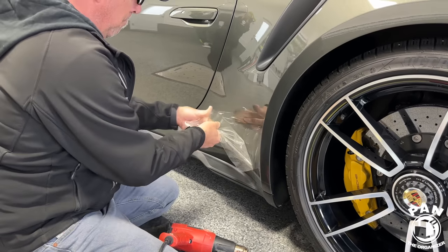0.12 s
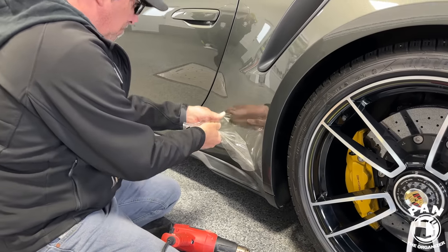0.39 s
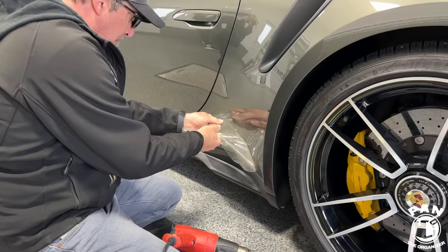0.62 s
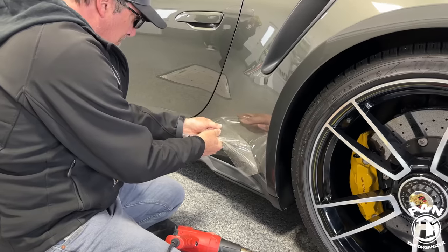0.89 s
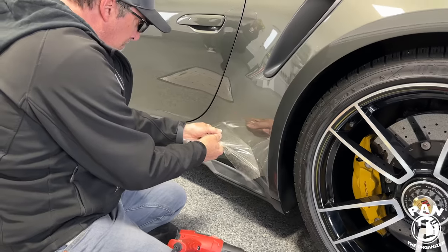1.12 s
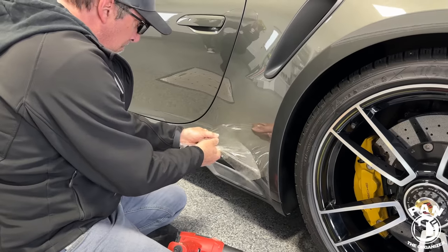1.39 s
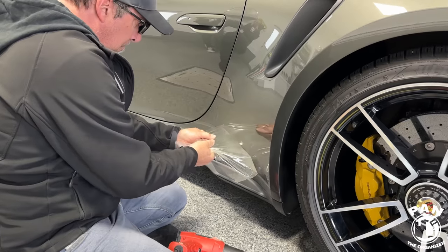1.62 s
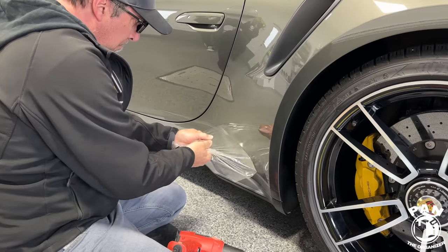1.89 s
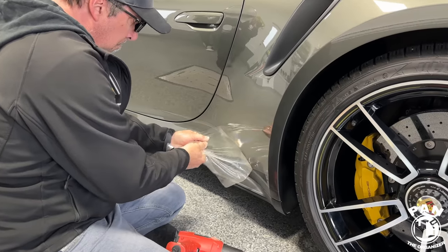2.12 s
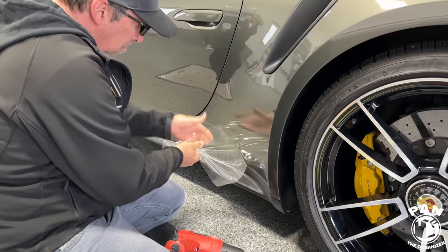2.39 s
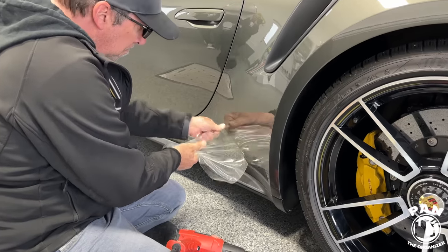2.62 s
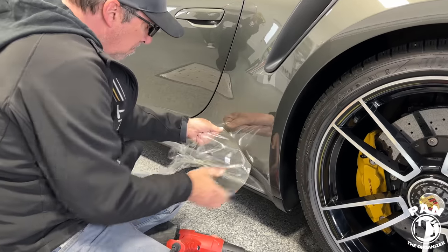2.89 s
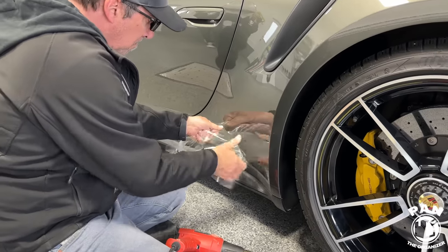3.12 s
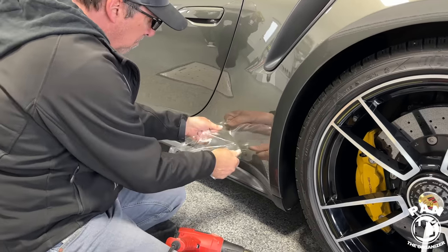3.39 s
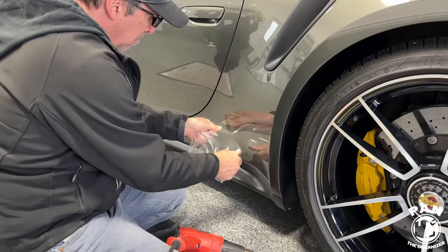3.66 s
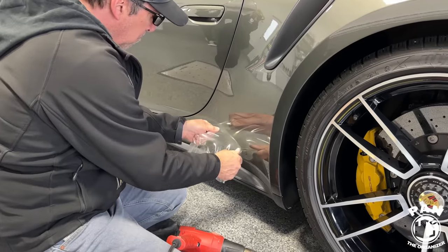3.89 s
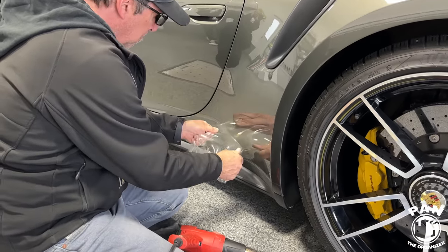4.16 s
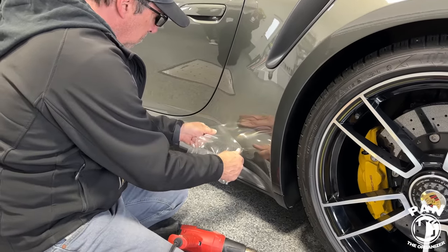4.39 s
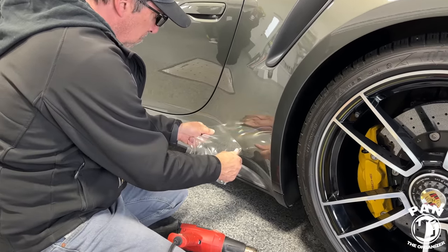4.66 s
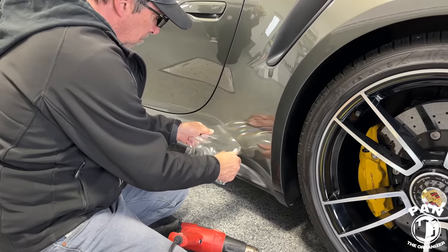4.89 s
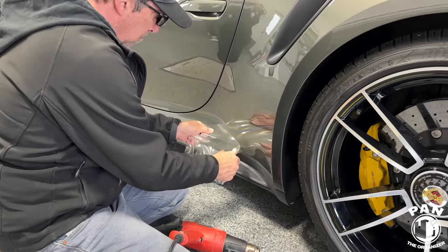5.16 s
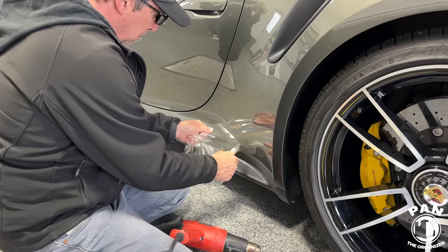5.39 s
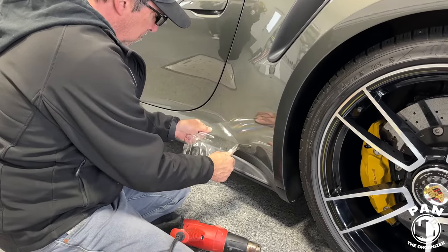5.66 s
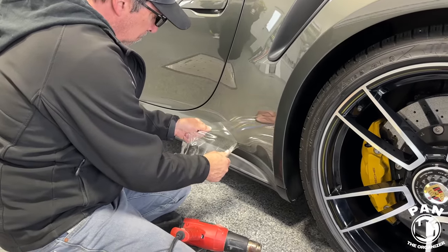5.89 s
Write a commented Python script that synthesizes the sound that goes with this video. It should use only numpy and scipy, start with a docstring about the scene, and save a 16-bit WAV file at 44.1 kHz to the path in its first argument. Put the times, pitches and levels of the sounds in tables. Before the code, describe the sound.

Close, in a moderately echoing garage, plastic film rustles and ticks weakly, then is pulled from a car panel in sharp irregular jerks. Each release snaps, rings briefly and trails fine crackles while the panel booms low. A deep thud ends the peeling; a few buckles, a quick hand rub and a soft swish follow, then near quiet over low rumble and faint hiss.

```python
"""A stiff plastic film is pulled off a car door in jerks, in a garage, then gathered in the hands.
First come a faint rustle, weak snaps and a few buckles; then each jerk lets the glue go: the film rings
and cracks, trails smaller crackles and the door panel booms by modal resonance, with one last deep thud.
Then the film buckles more often, a hand slides over it, the sheet swishes, and faint handling remains.
The room answers with a decaying noise tail; low rumble and faint hiss, shaped noise, lie underneath."""
import sys
import numpy as np
from scipy import signal
from scipy.fft import rfft, irfft, next_fast_len
from scipy.io import wavfile
from scipy.ndimage import map_coordinates

SR = 44100
rng = np.random.default_rng(int(sys.argv[2]) if len(sys.argv) > 2 else 0)


def field_ratio(decibels):
    """Amplitude ratio for a level in dB (20 dB per decade); scalars and array-likes work."""
    return 10 ** (np.asarray(decibels, dtype=float) / 20)


def store_wav(level_fs):
    """Save 16-bit WAV to argv[1]."""
    pcm = np.round(np.clip(np.atleast_2d(level_fs), -1, 1) * 32767)
    wavfile.write(sys.argv[1], SR, pcm.T.astype(np.int16))


N = 265923  # samples


def unit(x):
    """Normalization: the signal scaled to rms 1."""
    return x / np.sqrt(np.mean(x ** 2) + 1e-20)


def along(points, hz):
    """Interpolation of (Hz, value) points on a logarithmic frequency axis."""
    point_hz, value = np.transpose(points)
    return np.interp(np.log(hz + 1), np.log(point_hz + 1), value)


def filtered(x, response):
    """Linear filtering: the spectrum of x times a complex response of frequency."""
    size = next_fast_len(x.shape[-1] + 8192)  # room for the filter to die away
    spectrum = rfft(x, size) * response(np.fft.rfftfreq(size, 1 / SR))
    return irfft(spectrum, size)[..., :x.shape[-1]]


def resonances(peaks):
    """Superposition of damped resonators, (Hz, width Hz, dB) each, with alternating signs."""
    def response(f):
        total = 0
        for k, (center, width, db) in enumerate(peaks):
            damping = 1j * f * width
            total = total + (-1) ** k * field_ratio(db) * damping / (center * center - f * f + damping)
        return total
    return response


def pair(alike, size):
    """Partial coherence: mid and side noises mixed to the left-right likeness asked at each frequency."""
    def mixing(hz):
        angle = np.arccos(np.clip(along(alike, hz), -1, 1)) / 2
        return np.array([np.cos(angle), np.sin(angle)])
    mid, side = filtered(rng.standard_normal((2, size)), mixing)
    return np.array([mid + side, mid - side])


def grains(count, spread_db):
    """Shot noise: ticks at random moments, some larger than the rest, at rms 1."""
    when, size, sign = rng.random((count, 3)).T
    height = field_ratio(-spread_db * np.log(1.003 - size)) * np.sign(sign - 0.5)
    return unit(np.bincount((when * N).astype(int), height, N))


# The glue letting go. Each row: start in seconds, ring level in dB before the clean and rough weights,
# ring frequency in Hz, crack level in dB before the crease resonances.
GLUE_SNAPS = [(0.024, -26, 1210, -29), (0.054, -26, 1590, -20.5), (0.7338, -7, 966, -28),
              (0.7678, -8, 1800, -12), (1.1456, -2.5, 1060, -7.5), (1.167, -10, 980, -11),
              (1.185, -9.5, 1110, -7.5), (1.194, -9, 1170, -11), (1.207, -10.5, 1370, -14.5),
              (1.4885, -0.5, 1870, -14.5), (1.4951, -4.5, 1040, -11), (1.51, -5.5, 1360, -6.5),
              (1.519, -4.5, 1010, -11), (1.538, -9, 1640, -9.5), (1.573, -13, 1200, -18),
              (1.6447, -9, 1090, -10), (1.7496, -18, 1370, -35), (1.9456, -6, 2010, -8),
              (1.9538, -3.5, 1770, -8), (1.983, -12, 1520, -10), (1.997, -12, 1010, -14.5),
              (2.019, -18, 1200, -18.5), (2.178, -23, 930, -32.5), (2.185, -14.5, 2050, -13),
              (2.2058, -1, 1190, -8), (2.25, -13.5, 1590, -11.5), (2.266, -12.5, 1520, -21),
              (2.2999, -6, 1520, -12.5), (2.358, -22.5, 1800, -18.5), (2.603, -20.5, 961, -10.5),
              (2.6268, -7.5, 674.4, -3.5), (2.675, -24.5, 1400, -13.5)]
# Film buckling in the hands, a few times before the pulling and more often after it. Each row:
# start in seconds, ring level in dB, ring frequency in Hz, crack level in dB, weighted as above.
FILM_BUCKLES = [(0.1727, -19, 1153, -19), (0.214, -31.5, 1280, -59), (0.388, -35.5, 596, -58),
                (0.432, -40.5, 1150, -44), (0.5, -46, 1110, -47), (2.771, -31, 700, -53),
                (2.797, -44.5, 730, -26.5), (2.956, -36.5, 617, -39), (3.246, -21.5, 526, -20.5),
                (3.319, -24, 1390, -25), (3.33, -24, 658, -36), (3.349, -24.5, 1185, -25.5),
                (3.379, -24, 1530, -32), (3.4747, -20.5, 1470, -23), (3.5007, -20.5, 1500, -26),
                (3.5247, -20.5, 1550, -30), (3.6057, -26.5, 1435, -33.5), (3.6997, -30, 620, -52),
                (3.73, -35.5, 573, -57), (3.7807, -37.5, 544, -59), (5.9587, -33, 631, -55)]
# Resonances of the taut film. Each row: center in Hz, width in Hz, level in dB.
TAUT_FILM = [(763, 620, 6), (1400, 470, 9), (2000, 334, 10.5)]
# Resonances of a cracking crease. Each row: center in Hz, width in Hz, level in dB.
CREASE_PEAKS = [(3593, 1300, -5.5), (5420, 530, 0), (7700, 4400, -9.5), (14400, 1400, -4)]
# The whole sheet, heard from afar. Each row: center in Hz, width in Hz, level in dB.
WHOLE_SHEET = [(733, 670, 12), (1800, 1400, 8.5)]


def snaps(events, clean, rough, t60):
    """Impulsive release: the film rings briefly and cracks near by, and its whole sheet puffs to the walls."""
    ring, crack = np.zeros(N + SR), np.zeros(N + SR)
    puffs = np.zeros((2, N))
    t = np.arange(SR // 20) / SR
    for start_s, ring_db, hz, crack_db in events:
        at = round(start_s * SR)
        noise = rng.standard_normal((2, len(t)))
        noise /= np.std(noise[:, :60], axis=1, keepdims=True)  # even strength at the onset
        tone = np.sin(2 * np.pi * hz * t)
        tone += 0.18 * np.sin(2 * np.pi * 1.45 * hz * t)
        tone += 0.33 * np.sin(2 * np.pi * 0.53 * hz * t)
        flutter = filtered(noise[0], resonances(TAUT_FILM))  # uneven release roughens the ring
        rough_ring = rough * flutter * field_ratio(-60 * t / 0.03)
        clean_ring = clean * tone * field_ratio(-60 * t / t60)
        near_ring = field_ratio(ring_db) * (rough_ring - clean_ring)
        near_crack = field_ratio(crack_db - 60 * t / 0.014) * noise[1]
        ring[at:at + len(t)] += near_ring
        crack[at:at + len(t)] += near_crack
        puffs[:, at] = np.linalg.norm([near_ring, near_crack], axis=1)
    near = ring[:N] + filtered(crack[:N], resonances(CREASE_PEAKS))
    low_puff = filtered(puffs[0], resonances(WHOLE_SHEET))
    high_puff = filtered(puffs[1], resonances([(7300, 9600, -5)]))
    return np.array([near, low_puff + high_puff])


# Hands moving the film, one curve per handling. Each row: time in seconds, rustle level in dB
# before clumping, treble level in dB over the rustle.
HAND_CURVES = [
    [(0.0, -34.5, -8), (0.06, -52, -5.5), (0.17, -52, -12), (0.28, -56.5, -9.5), (0.51, -62, -9),
     (0.7, -70.5, -7.5)],
    [(2.5, -58, -9), (2.6, -54, 0), (2.64, -60, 18), (2.8, -70, 3), (2.86, -66, 3), (3.112, -60, -1),
     (3.118, -41, -2.5), (3.22, -42, -6), (3.31, -37.5, -9), (3.42, -61, -24), (3.616, -55.5, -34),
     (3.8, -75, -26), (3.9, -95, -16)],
    [(4.7, -85, -17), (5.24, -82, -16), (5.42, -86, -13), (5.562, -68.5, -5), (5.7, -81, -6),
     (5.73, -70, -4.5), (6.03, -67, -3)],
]
# Spectral shape of the rustle's body. Each row: frequency in Hz, relative density in dB per Hz.
RUSTLE_BODY = [(88, -30.5), (150, 4), (511, 1), (1030, -1.5), (1390, -0.5), (2550, -13.5), (2950, -26.5),
               (3500, -27.5), (4550, -47), (7700, -120)]


def crackle():
    """Crackling noise of small creases: a dying trail behind each snap, and a rustle as the hands move."""
    trail_db, trail_treble_db = -15.5, -32  # relative to the snap's ring level
    trail_t30_s = 0.085  # time to fall by 30 dB
    uneven_db, clumps_per_s = 2.5, 40
    t, power = np.arange(N) / SR, np.zeros(N)
    for start_s, ring_db, *_ in GLUE_SNAPS:
        power[round(start_s * SR)] += field_ratio(2 * ring_db)
    power_decay = field_ratio(2 * -30 * t[:SR] / trail_t30_s)
    trail = np.sqrt(np.abs(signal.fftconvolve(power, power_decay)[:N]))
    body, treble = field_ratio(trail_db) * trail, field_ratio(trail_treble_db) * trail
    for rows in HAND_CURVES:
        time_s, db, treble_db = np.transpose(rows)
        body = body + field_ratio(np.interp(t, time_s, db, -150, -150))
        treble = treble + field_ratio(np.interp(t, time_s, db + treble_db, -150, -150))
    ticks = grains(count=9000, spread_db=2.5)
    low_source = ticks + 2.1 * rng.standard_normal(N)
    high_source = ticks + 0.91 * rng.standard_normal(N)
    low = unit(filtered(low_source, lambda hz: field_ratio(along(RUSTLE_BODY, hz))))
    high = unit(filtered(high_source, resonances(CREASE_PEAKS)))
    clumps = map_coordinates(rng.standard_normal(250), [t * clumps_per_s])
    return field_ratio(uneven_db * clumps) * (body * low + treble * high)


# The door panel springing back. Each row: start in seconds, strike level in dB,
# lean towards the lowest modes in dB per octave.
PANEL_STRIKES = [(0.021, -33, 11.5), (0.736, -24, 0), (.775, -29.5, 5.5), (1.151, -12, -2),
                 (1.201, -26.5, 4), (1.494, -22.5, -4.5), (1.531, -28.5, 5.5), (1.65, -22, -4),
                 (1.953, -19, -5), (2.210, -22.5, 0), (2.304, -34, 13), (2.631, -28, -5.5)]
# Modes of the door panel. Each row: frequency in Hz, level in dB before the lean and random change,
# time to fall by 60 dB in seconds.
PANEL_MODES = [(60, -13, .1), (83.8, -7, 0.29), (135, 3, 0.1), (176.2, 4, 0.052), (236.7, -2.5, 0.14),
               (318.8, -16.5, 0.028), (408, -11, 0.044), (606.4, -12, 0.12), (738.7, -11.5, 0.11)]


def panel():
    """Modal resonance: each strike excites the modes at new strengths, and the nearest wall slaps it back."""
    out, t = np.zeros(N + SR), np.arange(SR // 2) / SR
    attack = 1 - np.exp(-t / 0.00056)
    for start_s, strike_db, lean_db in PANEL_STRIKES:
        new_db = rng.normal(0, 1.5, len(PANEL_MODES))
        ring = np.zeros(len(t))
        for (hz, mode_db, t60), change_db in zip(PANEL_MODES, new_db):
            level_db = mode_db + change_db - lean_db * np.log2(hz / 130)
            ring += field_ratio(level_db - 60 * t / t60) * np.sin(2 * np.pi * hz * t)
        out[round(start_s * SR):][:len(t)] += field_ratio(strike_db) * ring * attack
    slap = field_ratio(-6.5) * np.pad(out, (round(0.022 * SR), 0))[:N]
    # a small panel radiates little deep bass
    return filtered(out[:N] + slap, lambda hz: (1j * hz / (55 + 1j * hz)) ** 2)


def thud(start_s, peak_db, hz, t60):
    """Damped oscillation: the last jerk sets the whole door swinging on one deep note."""
    t = np.clip(np.arange(N) / SR - start_s, 0, None)
    return field_ratio(peak_db - 60 * t / t60) * np.sin(2 * np.pi * hz * t)


def played(strokes, rise_s, fall_db_per_s):
    """Amplitude envelope: each (start s, hold s, dB) stroke rises, holds and dies exponentially."""
    start, hold, db = np.transpose(strokes)[:, :, None]
    t = np.arange(N) / SR - start
    rise = np.clip(t / rise_s, 0, 1) ** 2
    fall_db = fall_db_per_s * np.clip(t - rise_s - hold, 0, None)
    return np.sum(rise * field_ratio(db - fall_db), axis=0)


# A hand sliding over the film in strokes. Each row: start in seconds, hold in seconds, level in dB.
HAND_STROKES = [(3.112, .13, -60.5), (3.155, .005, -41), (3.228, .005, -44), (3.258, .035, -34.5)]
# Resonances of the rubbed film. Each row: center in Hz, width in Hz, relative level in dB.
RUBBED_FILM = [(1979, 710, 1.5), (3890, 790, 0), (5020, 380, 3), (8450, 780, -10), (14000, 3400, -19)]


def slide():
    """Stick-slip friction: very dense tiny slips under the hand excite the film's resonances."""
    slips = unit(filtered(grains(count=30000, spread_db=3), resonances(RUBBED_FILM)))
    return played(HAND_STROKES, rise_s=0.012, fall_db_per_s=600) * slips


# The loose sheet swishing as it settles. Each row: start in seconds, hold in seconds, level in dB.
SETTLING_STROKES = [(3.34, 0.0045, -50.5), (3.46, 0.032, -46.5)]


def swish():
    """Band-limited noise: the settling sheet is one broad resonance applied twice."""
    noise = unit(filtered(rng.standard_normal(N), lambda hz: resonances([(3200, 3200, 0)])(hz) ** 2))
    return played(SETTLING_STROKES, rise_s=0.04, fall_db_per_s=150) * noise


# Level difference of the microphone pair. Each row: frequency in Hz, left over right in dB.
PAIR_LEVEL = [(60, -1), (130, -0.5), (290, -1), (640, -1), (1410, -6), (3100, 1), (6820, 8.5), (15000, 0)]
# Phase difference of the microphone pair. Each row: frequency in Hz, lead of the left in radians.
PAIR_LEAD = [(60, 0), (1210, -.4), (1640, -.8), (1980, -.1), (2930, 1.9), (4050, .6), (6630, .8),
             (7670, 3.4), (8300, 6.2), (10400, 3.5), (12100, 2.8), (13300, .3)]


def microphone_pair(x):
    """Interchannel differences: level and phase, split evenly between left and right."""
    def ports(hz):
        level_db, lead = along(PAIR_LEVEL, hz), along(PAIR_LEAD, hz)
        return np.array([field_ratio(half * level_db) * np.exp(1j * half * lead) for half in (0.5, -0.5)])
    return filtered(x, ports)


# Decay of the garage. Each row: frequency in Hz, time to fall by 60 dB in seconds.
GARAGE_DECAY = [(80, .5), (250, 0.54), (1000, 0.53), (3000, 0.55), (8000, 0.45), (15000, 0.16)]


def garage(x):
    """Reverberation: each frequency dies at its own speed, with a new noise tail every fifth of a second."""
    out, step = np.zeros((2, N + 2 * SR)), SR // 5
    delay = 220  # samples before the answer
    for at in range(0, N, step):
        noise = pair([(100, 1.0), (400, 0.32), (1500, 0.092)], size=SR * 3 // 5)
        hz, t, z = signal.stft(noise, SR, nperseg=512)
        decay = field_ratio(-60 * t / along(GARAGE_DECAY, hz)[:, None])
        tail = signal.istft(z * decay, SR, nperseg=512)[1]
        tail = tail / np.linalg.norm(tail[0])
        wet = signal.fftconvolve(x[None, at:at + step], tail, axes=1)
        out[:, at + delay:at + delay + wet.shape[1]] += wet
    return out[:, :N]


# Spectral shape of rumble and hiss. Each row: frequency in Hz, relative density in dB per Hz.
RUMBLE_SHAPE = [(15, -43.5), (25, -21.5), (87, 1), (108, -12.5), (145, -22), (212, -11), (335, -25.5),
                (451, -24), (503, -30), (560, -30.5), (840, -39.5), (1330, -38.5), (1520, -45),
                (6210, -51.5), (16000, -60)]
# Coherence of the background. Each row: frequency in Hz, left-right likeness from 0 to 1.
BACKGROUND_LIKENESS = [(60, 0.98), (240, 0.82), (950, 0.16), (3770, 0.063), (15000, 0.12)]


def rumble():
    """Colored noise: steady low noise of the building with a faint hiss, swelling a little."""
    swell = map_coordinates(rng.standard_normal(60), [np.arange(N) * 8 / SR])  # 8 random points a second
    noise = filtered(pair(BACKGROUND_LIKENESS, size=N), lambda hz: field_ratio(along(RUMBLE_SHAPE, hz)))
    return field_ratio(-51 + 0.95 * swell) * unit(noise)


def scene():
    """Superposition of direct sound from film and door, their echo and the background."""
    tearing = snaps(GLUE_SNAPS, clean=0.57, rough=0.55, t60=0.014)
    buckling = snaps(FILM_BUCKLES, clean=0.81, rough=0.47, t60=0.019)
    near, puff = tearing + buckling
    rustle = crackle() + slide() + swish()
    door = panel() + thud(2.641, peak_db=-11.5, hz=84.0, t60=0.12)
    to_walls = field_ratio(-10.5) * near + field_ratio(-6.5) * puff + field_ratio(-7) * rustle + field_ratio(-10) * door
    return microphone_pair(near + rustle + door) + garage(to_walls) + rumble()


def roll_off(x):
    """The treble ends steeply here."""
    return signal.sosfilt(signal.butter(12, 16810, fs=SR, output="sos"), x)


# Overall tone shaping of the mix, with a treble dip and a steep cutoff.
# Each row: frequency in Hz, gain in dB.
RECORDING_RESPONSE = [(20, -30.5), (40, -1.5), (70, 1.5), (9500, -2), (10500, -7), (11800, -13.5),
                      (12500, -4), (15700, -7), (16300, -34), (17000, -69)]


def record(dry):
    """Linear filtering: an overall frequency response shapes the tone of the mix."""
    mix = filtered(dry, lambda hz: field_ratio(along(RECORDING_RESPONSE, hz)))
    return roll_off(mix)


dry = scene()
out = record(dry)
store_wav(out)
```